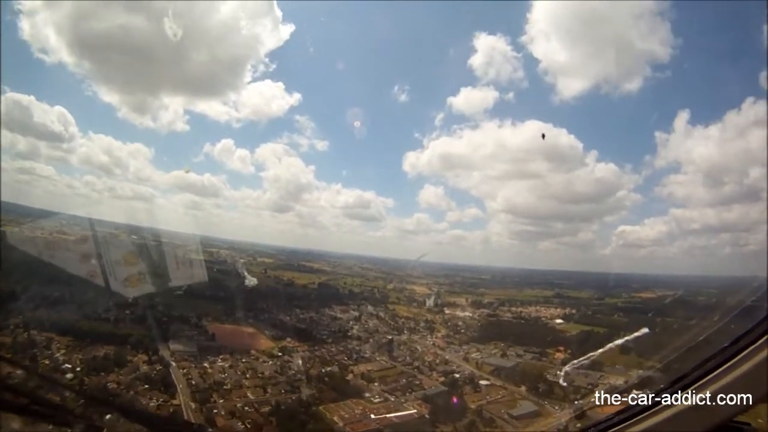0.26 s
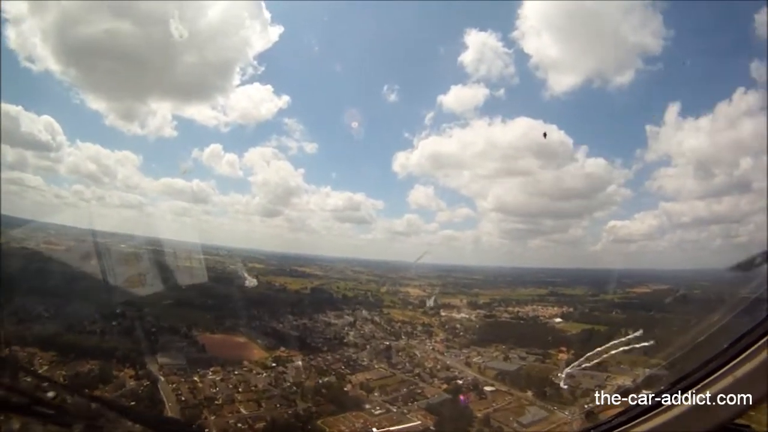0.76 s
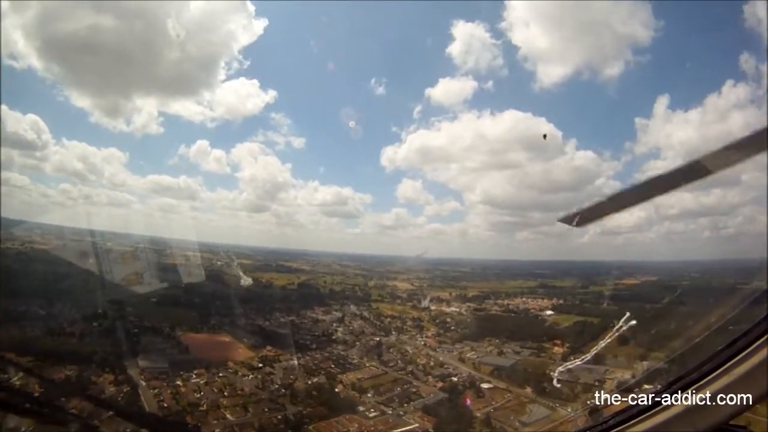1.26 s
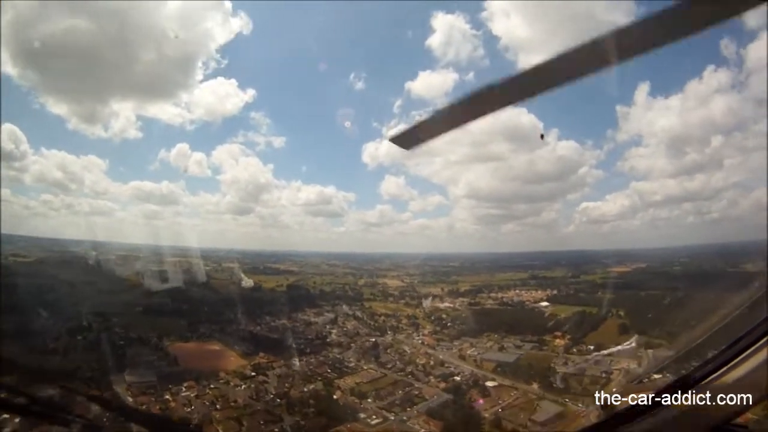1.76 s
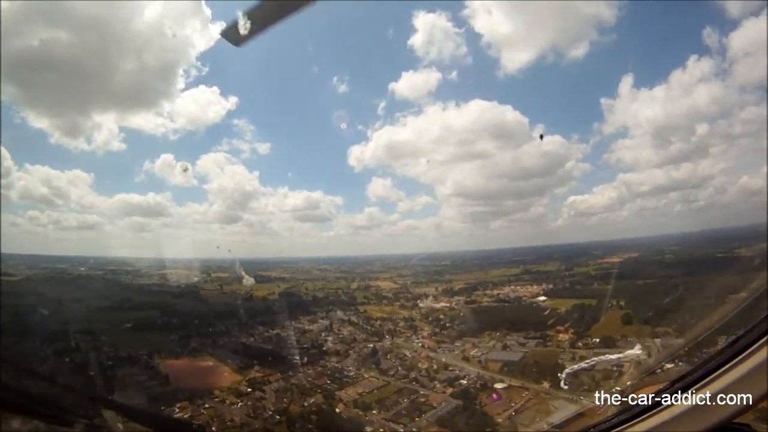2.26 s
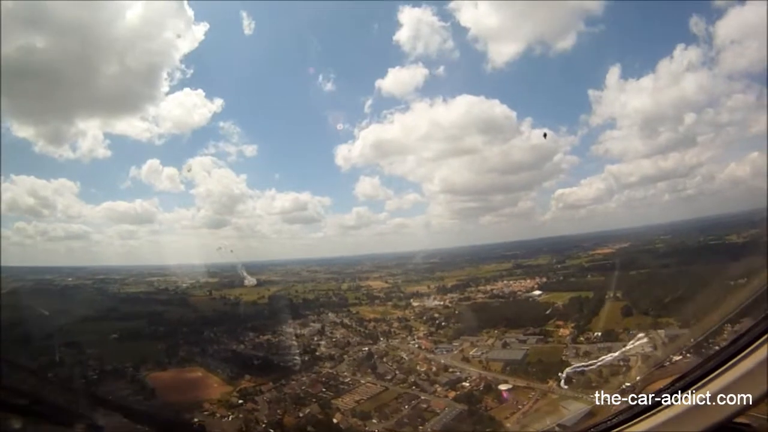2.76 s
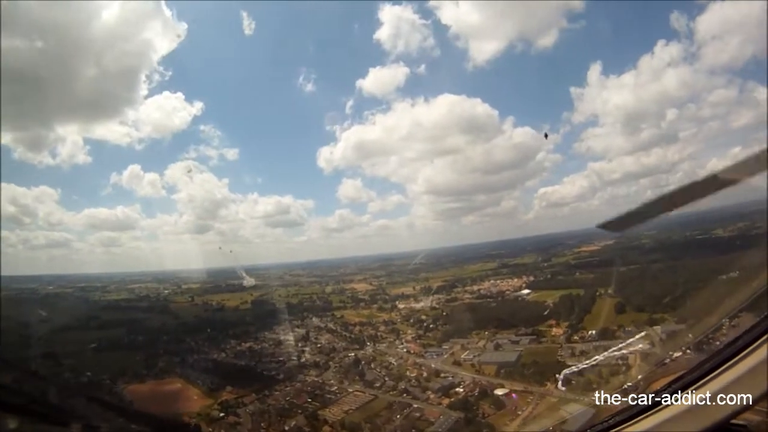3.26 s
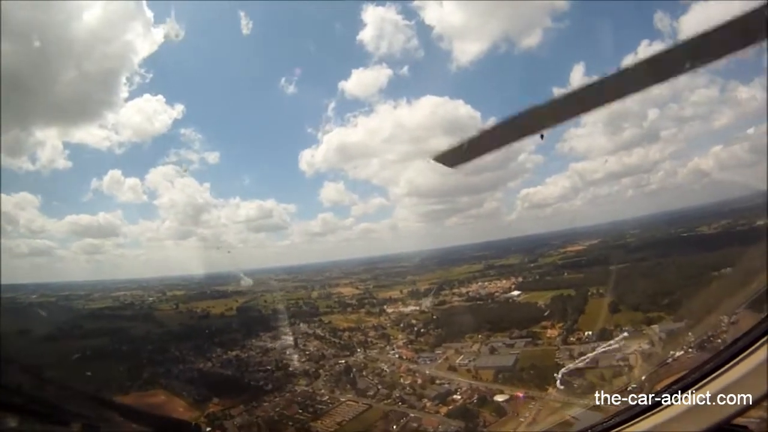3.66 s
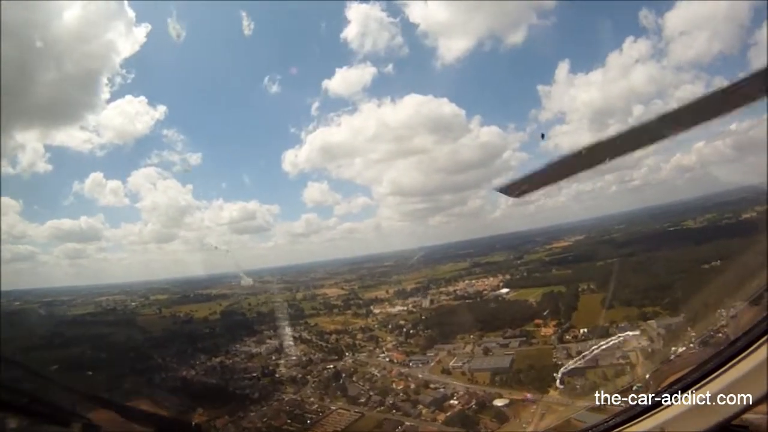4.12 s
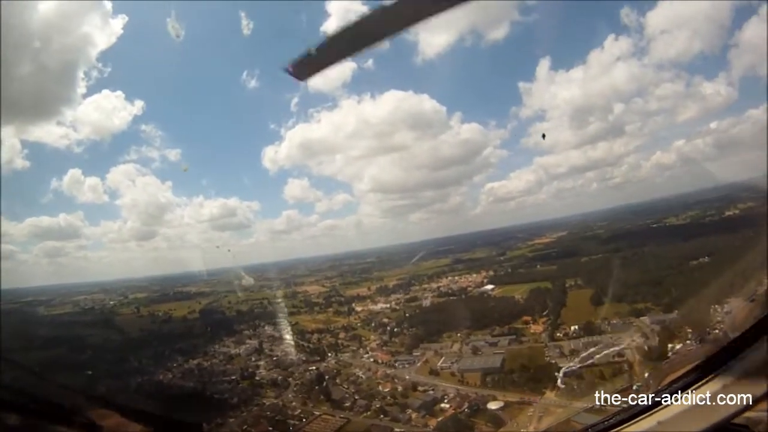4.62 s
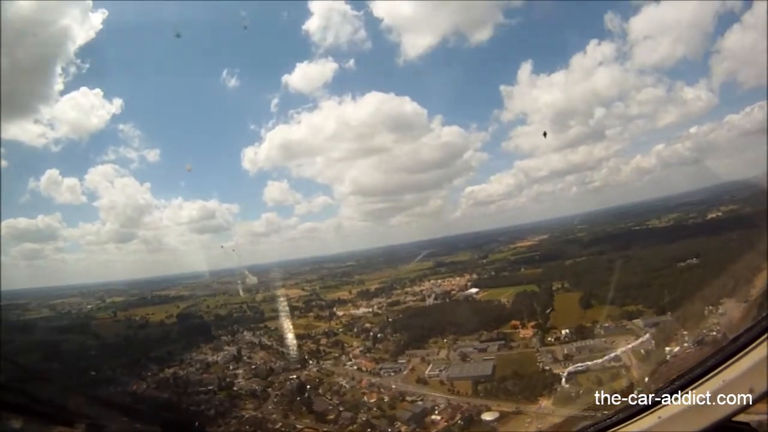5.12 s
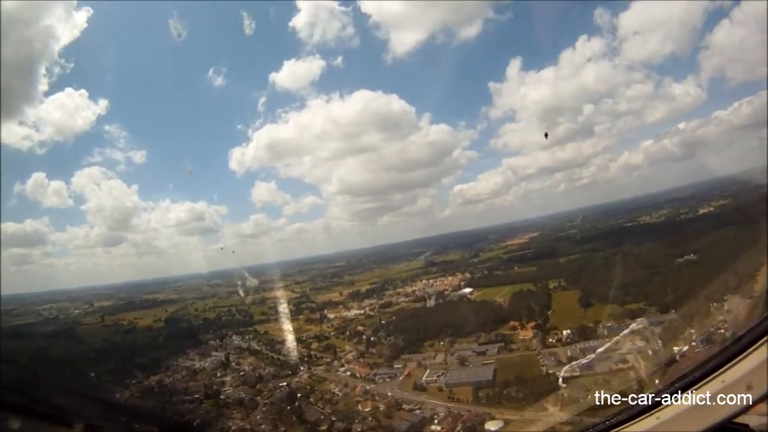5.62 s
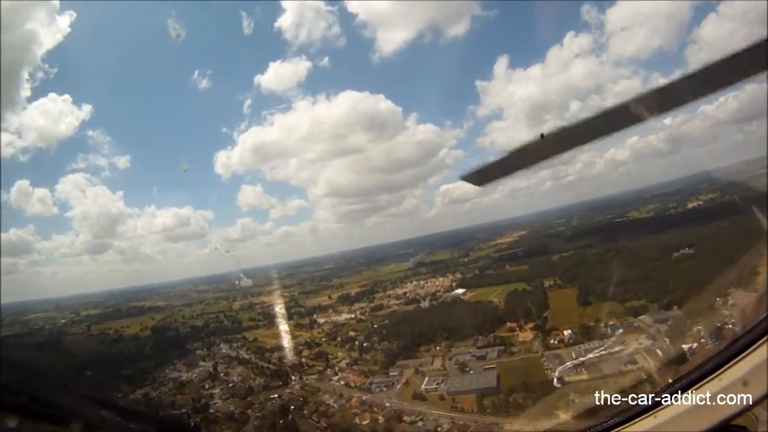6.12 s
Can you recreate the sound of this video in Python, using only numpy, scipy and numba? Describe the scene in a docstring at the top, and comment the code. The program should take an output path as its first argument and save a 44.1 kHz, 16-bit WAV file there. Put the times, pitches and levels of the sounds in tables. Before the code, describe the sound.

Inside a helicopter cabin in steady cruise, a loud low rotor throb and rumbling air noise drone on, with faint gearbox whine above.

```python
"""In the cabin of a turbine helicopter in cruise: the throb of the main rotor and the tones of tail rotor and
drive shaft, all sums of harmonics geared to one slowly changing speed. With them come gearbox whistles, made of
narrow noise that follows this speed, and the rumble and rush of air on the cabin shell, made of coloured noise.
A small camera compresses the peaks and samples coarsely, which mirrors the sound into the treble."""
import sys
import numpy as np
from scipy import signal
from scipy.io import wavfile
from scipy.ndimage import uniform_filter1d
from numba import njit

SR = 44100
rng = np.random.default_rng(int(sys.argv[2]) if len(sys.argv) > 2 else 0)


def unload_wav(signal):
    """Save mono or channel-first audio to the path in sys.argv[1] as 16-bit WAV at rate SR, clipped to [-1, 1]."""
    wavfile.write(
        sys.argv[1],
        SR,
        np.round(np.clip(np.atleast_2d(signal).T, -1, 1) * 32767).astype(np.int16),
    )


def makeup_ratio(level_db):
    """Linear amplitude ratio for a level in decibels (20 dB per factor of ten)."""
    decades = np.asarray(level_db, float) / 20
    return 10 ** decades


N = 281358  # length in samples

# rates of the geared parts, as fractions of the drive-train speed
MAIN_RATIO, TAIL_RATIO, SHAFT_RATIO = 19.5 / 137.75, 1 / 2, 100.97 / 137.75


def evened(x):
    """Scales a signal to an rms of 1."""
    return x / np.sqrt(np.mean(x ** 2) + 1e-20)


def drift(rate_hz):
    """Slow random curve of rms 1: sines of random phase, the slower the larger."""
    t = np.arange(0, N + 400, 400) / SR
    hz = np.geomspace(.1, 1, num=16)[:, None] * rate_hz
    sines = np.sin(2 * np.pi * (hz * t + rng.random(hz.shape)))
    slow = (sines / np.sqrt(hz)).sum(axis=0)
    return np.interp(np.arange(N) / SR, t, evened(slow))


def quick(frames, size):
    """Random curve of rms 1 that changes within a tenth of a second and has no slow drift."""
    draw = rng.standard_normal(frames)
    return evened(uniform_filter1d(draw, size=size) - uniform_filter1d(draw, size=20))


def drive_turns():
    """Running count of cycles at the speed that all the geared parts share."""
    # second harmonic of the tail-rotor blade rate: t/s, f/Hz
    speed_table = [(0.0, 138.07), (0.8, 138.3), (1.6, 138.01), (2.4, 137.83), (3.2, 137.62), (4.0, 137.28),
                   (4.7, 137.23), (5.3, 137.62), (5.9, 138.04), (6.38, 137.97)]
    speed_hz = np.interp(np.arange(N) / SR, *np.transpose(speed_table))
    return np.cumsum(speed_hz) / SR


def rotating(cycles, orders, waver_db, wobble_rad):
    """Cosines at multiples of one rate add up to a pressure pulse per cycle; each wavers in level and phase."""
    start = rng.random()
    total = np.zeros(N)
    for multiple, db in orders:
        loudness = np.sqrt(2) * makeup_ratio(db + waver_db * drift(3))
        phase = 2 * np.pi * round(multiple) * (cycles + start) + wobble_rad * drift(3)
        total += loudness * np.cos(phase)
    return total


def drive_train():
    """Main rotor, tail rotor and drive shaft turn in fixed ratios, so their tones rise and fall together."""
    # main-rotor harmonics: multiple of the blade-pass rate, level/dB over throb_db
    main_orders = [(1, -1), (2, 4.5), (3, -2), (4, -13), (5, -8), (6, -11), (8, -6), (10, -5)]
    # tail-rotor harmonics: multiple of the blade rate, rms level/dB
    tail_orders = [(1, -23.5), (2, -23.5), (3, -36), (4, -39.5)]
    # drive-shaft harmonics: multiple of the shaft rate, rms level/dB
    shaft_orders = [(1, -26.5), (2, -48.5), (3, -50)]
    throb_db = -32.5  # rms level to which the main-rotor harmonics refer
    turns = drive_turns()
    # the lowest tone wavers more in level than the slap above it
    blade_pass = makeup_ratio(throb_db) * rotating(MAIN_RATIO * turns, main_orders[:1], 2.6, .2)
    slap = makeup_ratio(throb_db) * rotating(MAIN_RATIO * turns, main_orders[1:], 0.67, 0.38)
    tail = rotating(TAIL_RATIO * turns, tail_orders, 0.9, 0.17)
    shaft = rotating(SHAFT_RATIO * turns, shaft_orders, 1.8, 0.17)
    return blade_pass + slap + tail + shaft


def gearbox():
    """Meshing gears whistle fuzzily: narrow bands of noise that ride on the drive-train speed."""
    # gear-mesh whistles: f/Hz at the mean speed, width/Hz, rms level/dB
    whistles = [(1297, 6, -55), (3008, 55, -47.5), (4543, 8, -64), (4561, 6, -62), (5195, 14, -73)]
    turns, out = drive_turns(), np.zeros(N)
    mean_speed_hz = turns[-1] * SR / N
    for hz, width_hz, db in whistles:
        r = np.exp(-np.pi * width_hz / SR)
        noise = rng.standard_normal(N) + 1j * rng.standard_normal(N)
        fuzz = signal.lfilter([1], [1, -r], noise)
        carrier = np.exp(2j * np.pi * hz * turns / mean_speed_hz)
        out += makeup_ratio(db) * evened((fuzz * carrier).real)
    return out


def airflow():
    """Air rushes over the shell: random short-time spectra with resonances, patches and a swelling treble."""
    # colour of the air noise on the shell: f/Hz, relative level per Hz/dB
    shell = [(10, -74), (28, -60), (34, -62), (45, -43.5), (80, -41.5), (200, -46.5), (280, -51.5),
             (350, -50), (385, -46.5), (560, -47), (640, -56), (720, -57), (950, -68), (1500, -72.5),
             (2500, -74.5), (3500, -79.5), (4700, -78.5), (5300, -83.5), (5650, -91), (6050, -90.5)]
    # cabin and camera-housing resonances: f/Hz, width/Hz, lift/dB (below 0 a dip)
    rings = [(430, 96, 1.5), (1083, 73, 2), (1384, 49, 4.5), (1712, 184, 4.5), (2114, 340, 6.5),
             (3110, 140, 1.5), (3002, 620, 12), (3920, 100, 3.5), (240, 23, 2.5), (4300, 200, -2)]
    # slow swell of the treble of the rush: t/s, relative level/dB
    rush = [(0, 1), (.75, 0), (.95, -3), (1.32, 2), (1.5, -2), (1.68, 1), (1.88, -3.1), (2.1, 0.9),
            (2.54, -2.5), (2.72, 2.5), (2.87, -1.5), (3.22, .3), (3.42, -1.3), (4.0, 1.4), (4.7, 0),
            (4.9, 1.5), (5.1, -2.5), (5.8, 0.5), (6.38, -0.6)]
    hop = 512  # samples from one spectrum to the next
    frames, hz = N // hop + 5, np.fft.rfftfreq(2048, 1 / SR)
    real, imaginary, patches = rng.standard_normal((frames, len(hz), 3)).T
    # smooth over neighbouring frequencies, then over time
    patches = uniform_filter1d(patches, size=20, axis=0)
    patches = evened(uniform_filter1d(patches, size=6, axis=1))

    f, shell_db = np.transpose(shell)
    colour_db = np.interp(np.log(hz + 1), np.log(f + 1), shell_db)
    for f0, width_hz, lift_db in rings:
        colour_db += lift_db / (1 + (2 * (hz - f0) / width_hz) ** 2)

    flicker_db = 0.68 * quick(frames, size=5)
    swell_db = np.interp(np.arange(frames) * hop / SR, *np.transpose(rush)) + flicker_db
    # the share of the swell grows from none in the bass to all in the treble, half at 400 Hz
    follows = hz ** 2 / (hz ** 2 + 400 ** 2)
    field_db = colour_db[:, None] + follows[:, None] * swell_db + 0.32 * patches
    # buffeting makes the low rumble come in lumps
    lumps_db = 2.18 * quick(frames, size=4)
    field_db += lumps_db / (1 + (hz[:, None] / 450) ** 2)
    spectra = (real + 1j * imaginary) * makeup_ratio(field_db)
    air = signal.istft(spectra, nperseg=2048, noverlap=2048 - hop)[1][:N]

    # the air noise has little below about 36 Hz
    air = signal.sosfilt(signal.butter(4, 36, "high", fs=SR, output="sos"), air)
    # every passing blade stirs the air a little
    beat_db = .6 * np.cos(2 * np.pi * (MAIN_RATIO * drive_turns() + rng.random()))
    return makeup_ratio(-18.0) * makeup_ratio(beat_db) * evened(air)


def scene():
    """All the sounds add up at one microphone."""
    return (drive_train() + gearbox() + airflow())[None]


@njit
def follow(level, rise, fall):
    """Peak follower: quick up, slow down."""
    out, held = np.empty(len(level)), level[:2000].mean() * 2
    for i in range(len(level)):
        held += (rise if level[i] > held else fall) * (level[i] - held)
        out[i] = held
    return out


def top_cut(x):
    """Nothing passes above the cut-off."""
    return signal.sosfilt(signal.butter(12, 16240, fs=SR, output="sos"), x)


def record(dry):
    """Camera: coarse sampling, gain that ducks after each peak, samples held in steps, band limit."""
    coarse_hz, fine_hz, edge_hz = 12000, 48000, 15310
    attack_s, release_s = .006, 0.054
    coarse = signal.resample(dry[0], N * coarse_hz // SR)
    rise = 1 / (attack_s * coarse_hz + 1)
    fall = 1 / (release_s * coarse_hz + 1)
    held = follow(np.abs(coarse), rise, fall)
    held_db = 20 * np.log10(held + 1e-9)
    # each dB above the mean level is turned down by 0.8 dB, each dB below is turned up as much
    ducked = coarse * makeup_ratio(-.8 * (held_db - held_db.mean()))
    # each sample is repeated, so the spectrum is mirrored at half the coarse rate
    steps = signal.resample(np.repeat(ducked, fine_hz // coarse_hz), N)
    low_pass = signal.firwin(1023, edge_hz, window=("kaiser", 7), fs=SR)
    mix = signal.oaconvolve(steps, low_pass, "same")[None]
    return top_cut(mix)


dry = scene()
out = record(dry)
unload_wav(out)
```